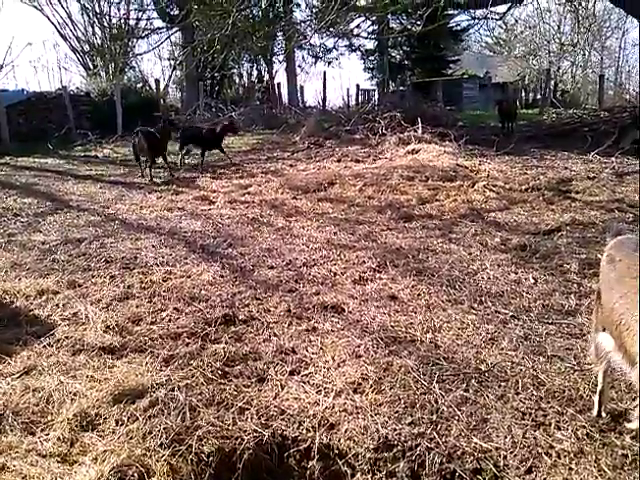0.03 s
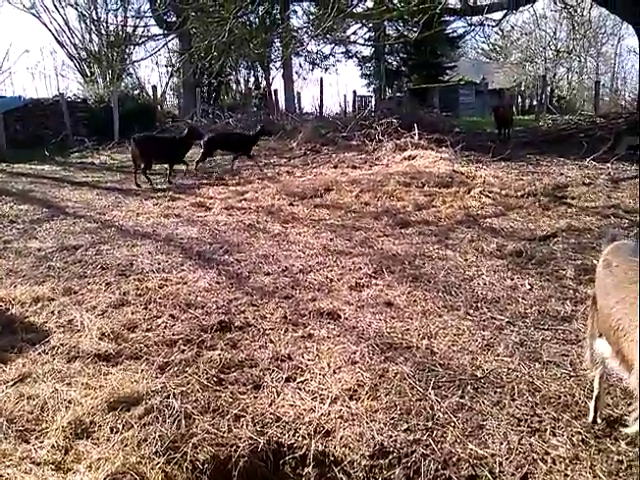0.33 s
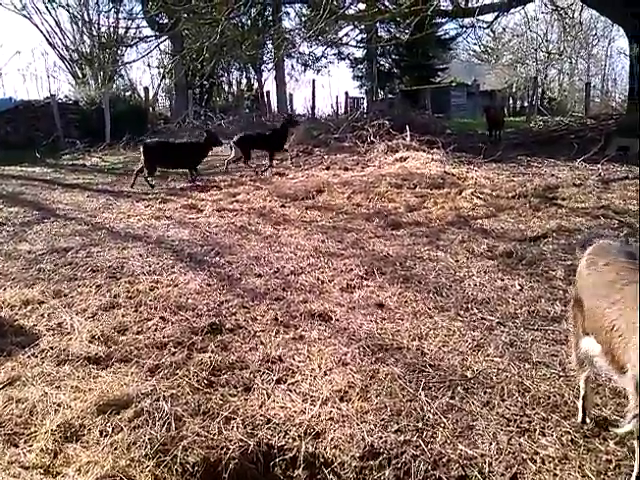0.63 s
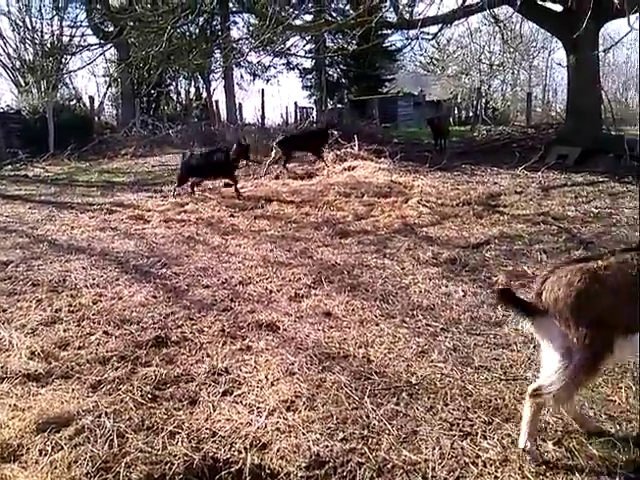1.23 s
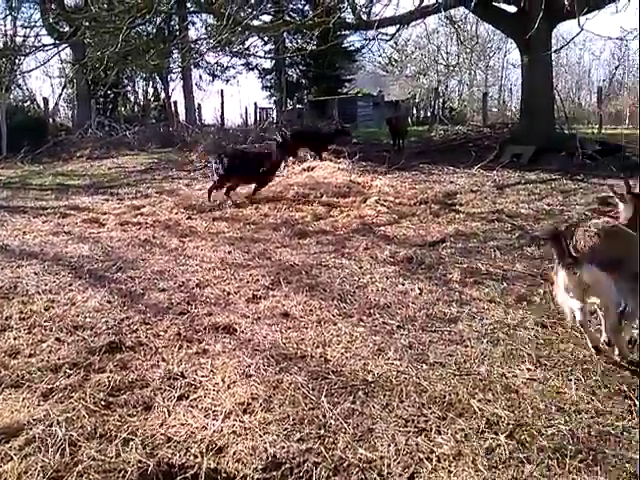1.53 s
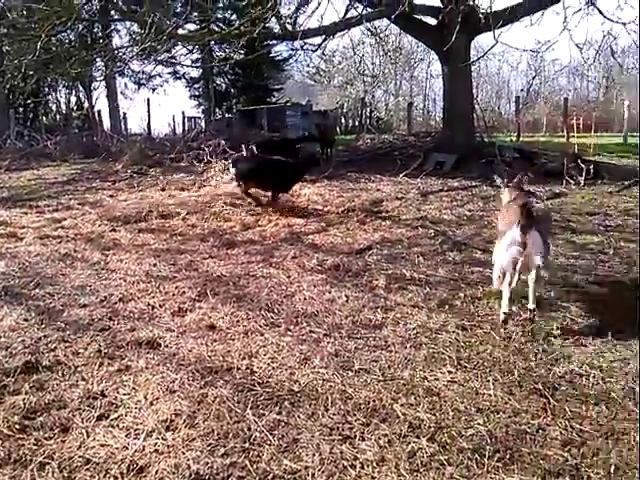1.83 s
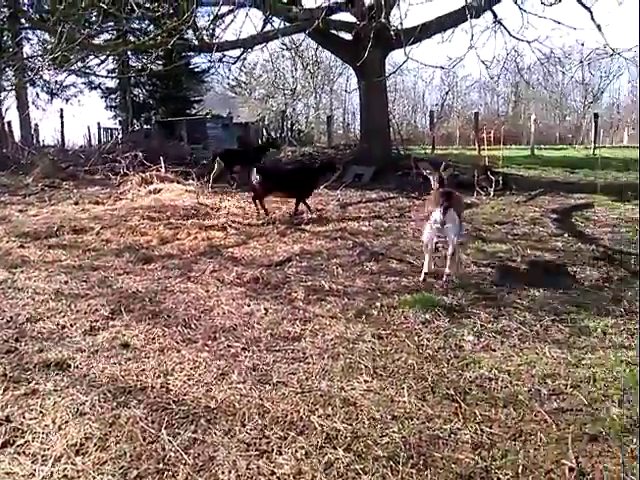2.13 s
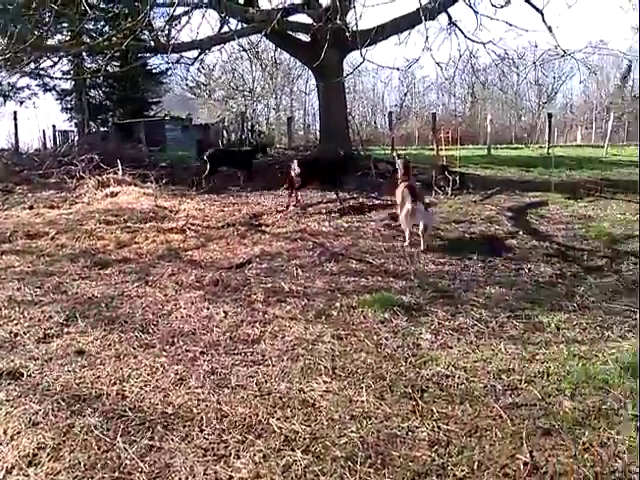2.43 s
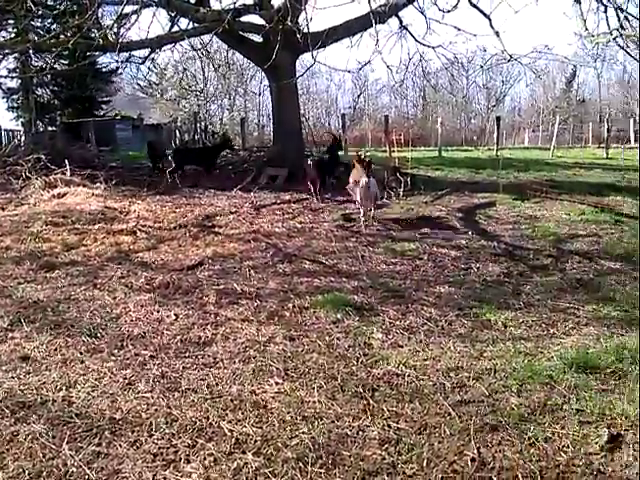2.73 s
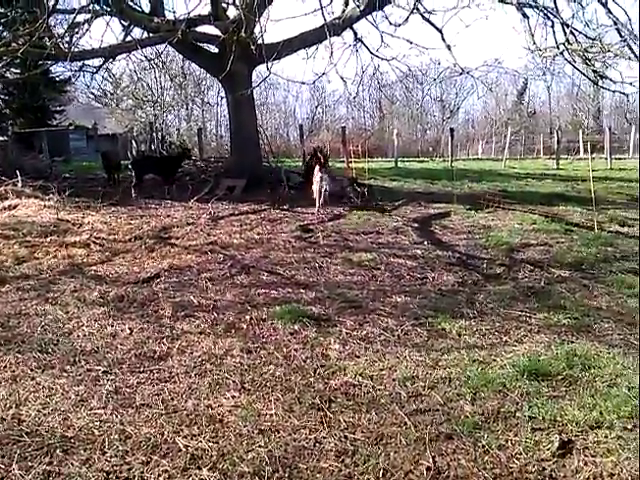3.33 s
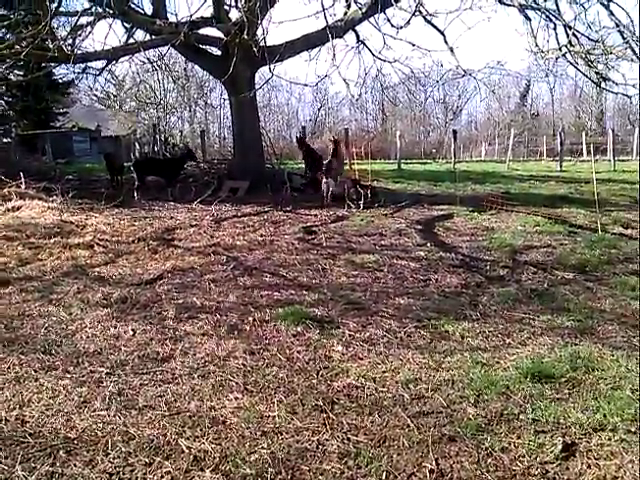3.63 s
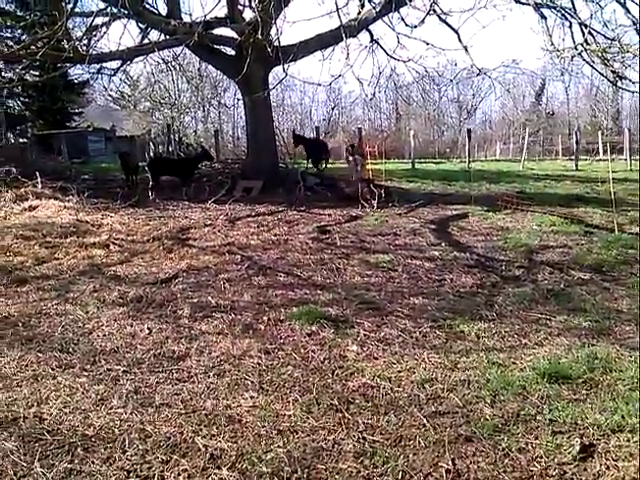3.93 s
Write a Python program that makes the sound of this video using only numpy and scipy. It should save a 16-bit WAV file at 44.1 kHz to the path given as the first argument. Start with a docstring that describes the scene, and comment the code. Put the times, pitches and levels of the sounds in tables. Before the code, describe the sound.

Dry straw rustles and snaps under trotting goats in a quiet paddock. A songbird twitters and trills first, a puff of wind bumps the microphone, then the steps crunch louder with soft hoof thuds.

```python
"""An open paddock, where goats trot away over dry straw: stalks rustle, crunch and snap in
tiny fractures, and hooves thud on the packed earth. A songbird twitters in whistles and rasps,
runs into a fading trill and goes on from farther off, its song scattered by the trees.
A puff of wind bumps the microphone over a quiet outdoor background."""
import sys
import numpy as np
from scipy import signal
from scipy.fft import rfft, irfft
from scipy.io import wavfile

SR = 44100
rng = np.random.default_rng(int(sys.argv[2]) if len(sys.argv) > 2 else 0)


def generate_wav(sig):
    """Save sig (samples, or channels by samples) to the path in sys.argv[1] as 16-bit PCM at SR."""
    pcm = np.round(np.clip(np.atleast_2d(sig).T, -1, 1) * 32767).astype(np.int16)
    wavfile.write(sys.argv[1], SR, pcm)


N = 176400
TIME = np.arange(N) / SR


def from_db(db):
    """Decibels to gain."""
    return 10 ** (np.asarray(db) / 20)


def rms_one(x):
    """Scale to rms 1."""
    return x / np.sqrt(np.mean(x ** 2) + 1e-20)


def response(colour, size=8192):
    """Minimum-phase impulse response of an EQ curve, at unit energy."""
    hz, db = np.transpose(colour)
    grid = np.maximum(np.arange(size // 2 + 1) * SR / size, 1)
    gain = from_db(np.interp(np.log(grid), np.log(hz), db))
    cepstrum = irfft(np.log(gain))
    cepstrum[1:size // 2] *= 2
    cepstrum[size // 2 + 1:] = 0
    ring = irfft(np.exp(rfft(cepstrum)))
    return ring / np.sqrt(np.sum(ring ** 2))


def coloured(x, colour):
    """Play a signal through an EQ curve; only the curve's shape counts."""
    return signal.fftconvolve(x, response(colour))[:N]


def shifted(colour, ratio):
    """The same EQ curve, pitched up or down."""
    return [(hz * ratio, db) for hz, db in colour]


def swells(rows):
    """Envelopes summed in power, each 20 dB down one rise before its peak and one fade after."""
    power = np.zeros(N)
    for time, rise, fade, db in rows:
        away = np.maximum((time - TIME) / rise, (TIME - time) / fade)
        near = away < 4
        power[near] += from_db(db - 20 * away[near]) ** 2
    return np.sqrt(power)


def wander(hz):
    """Smooth random modulation up to this rate; rms 1."""
    lowpass = signal.butter(2, hz, fs=SR, output="sos")
    return rms_one(signal.sosfilt(lowpass, rng.standard_normal(N)))


def unsteady(curve, flicker_db=2.5, flicker_hz=20):
    """Gain that rides a level curve and flickers around it."""
    flicker = flicker_db * np.clip(wander(flicker_hz), -2, 2)
    return from_db(np.interp(TIME, *np.transpose(curve)) + flicker)


def grains(per_s=5000, spread_db=2.5):
    """Random clicks of uneven size, like tiny fractures; rms 1."""
    sizes = from_db(spread_db * np.minimum(rng.exponential(1, N), 5))
    return rms_one(sizes * rng.choice([-1, 1], N) * (rng.random(N) < per_s / SR))


def scatter(x, t60_s):
    """Many faint echoes from stalks, trunks and branches."""
    echoes = (grains(per_s=1200, spread_db=1.5) * from_db(-60 * TIME / t60_s))[:SR]
    return signal.fftconvolve(x, echoes / np.sqrt(np.sum(echoes ** 2)))[:N]


def whistles(notes, waver, skew=1, taper=0.45):
    """Wavering sines that each arc through three pitches; skew delays the turn, taper softens the ends."""
    out = np.zeros(N)
    wobble = 1 + waver * wander(hz=256)
    for time, length, first, middle, last, db in notes:
        progress = np.linspace(0, 1, int(length * SR)) ** skew
        span = int(time * SR) + np.arange(len(progress))
        arc = np.polyfit([0, .5, 1], [first, middle, last], 2)
        hz = np.polyval(arc, progress) * wobble[span]
        envelope = from_db(db) * np.abs(np.sin(np.pi * progress)) ** taper
        out[span] += envelope * np.sqrt(2) * np.sin(2 * np.pi * np.cumsum(hz) / SR)
    return out


# Low rumble under a thin hiss: (frequency [Hz], level [dB])
AIR_COLOUR = [(20, -14), (45, 8.5), (70, -5), (200, -18.5), (700, -16), (2400, -22), (3700, -18.5),
              (8500, -32.5), (17000, -37.5)]

def background():
    """A quiet, steady bed of outdoor noise."""
    return from_db(-57.5) * coloured(rng.standard_normal(N), AIR_COLOUR)


# Fader ride of the straw under all the feet: (time [s], level [dB])
RUSTLE_LEVEL = [(.42, -52.5), (.56, -49), (.72, -51.5), (1.15, -53.5), (1.25, -48), (1.38, -45),
                (1.57, -55), (1.63, -51), (2.46, -50), (2.65, -55), (2.95, -52.5), (3.6, -52.5),
                (3.95, -58.5)]
# Legs brushing through: (time [s], rise [s], fade [s], level [dB])
SWISHES = [(1.505, 0.025, 0.062, -41), (1.788, 0.029, 0.04, -41.5), (2.555, 0.073, 0.055, -42.5)]
# Dry, papery top end: (frequency [Hz], level [dB])
RUSTLE_COLOUR = [(700, -18), (2400, -9.5), (3600, -14), (4600, -4), (5800, 3.5), (7200, -8), (8500, -16.5),
                 (16000, -24.5)]

def rustle():
    """Loose straw gives in countless tiny fractures, a touch brighter where legs sweep through it."""
    bed = coloured(unsteady(RUSTLE_LEVEL) * grains(), RUSTLE_COLOUR)
    swishes = coloured(swells(SWISHES) * grains(), shifted(RUSTLE_COLOUR, 1.06))
    return bed + swishes


# Fader ride of the running herd: (time [s], level [dB])
PATTER_LEVEL = [(1.0, -62.5), (1.7, -58), (4, -57)]
# Muffled low end: (frequency [Hz], level [dB])
PATTER_COLOUR = [(35, -3.5), (75, 3), (240, -5), (1200, -29)]

def herd_patter():
    """Far hoofbeats blur into a dull, flickering rumble."""
    return coloured(unsteady(PATTER_LEVEL) * rng.standard_normal(N), PATTER_COLOUR)


# Close whistles: (time [s], length [s], start [Hz], middle [Hz], end [Hz], level [dB])
OPENING_NOTES = [(0.00189, 0.0177, 3100, 2100, 2600, -48.5), (0.02, 0.038, 3400, 4250, 4450, -40.5),
                 (.065, .014, 4100, 3800, 2350, -48.5), (.06, 0.035, 5700, 6000, 5700, -49),
                 (.122, .032, 4400, 4440, 4560, -38.5), (.146, 0.035, 5830, 5950, 6200, -37.5),
                 (.163, .012, 5000, 4700, 2660, -39), (.173, 0.0373, 2950, 2620, 3000, -46.5),
                 (.186, .022, 4250, 3520, 3400, -45.5), (0.28, 0.0407, 2950, 2270, 3600, -42),
                 (0.277, 0.045, 3100, 3520, 3520, -51.5), (.32, 0.0367, 2800, 2350, 2700, -39.5),
                 (.316, 0.0606, 3280, 3365, 3120, -41), (.357, 0.0187, 2850, 2320, 2670, -41)]
# Raspy accents: (time [s], rise [s], fade [s], level [dB])
RASPS = [(.008, 0.05, 0.054, -36.5), (.068, 0.035, 0.058, -34), (.172, 0.01, 0.14, -41)]
# Their narrow, bright band: (frequency [Hz], level [dB])
RASP_COLOUR = [(2000, -23), (3600, -20), (4200, -5.5), (5200, -1), (6100, 2), (6700, -30), (9000, -36)]

def opening_twitter():
    """The songbird whistles in two voices, roughened by bursts of noise."""
    rasp = coloured(swells(RASPS) * rng.standard_normal(N), RASP_COLOUR)
    return whistles(OPENING_NOTES, waver=.012) + rasp


# Single stalks breaking: (time [s], level [dB], ring [Hz])
SNAPS = [(.110, -30.5, 5600), (.345, -44, 13700), (1.401, -46, 5200), (1.761, -47, 6100),
         (1.849, -45, 5900), (2.343, -24, 6000), (2.359, -29, 6000), (2.3625, -30.5, 6150),
         (2.506, -38.5, 5800), (2.539, -32, 5800), (2.9215, -22, 6150), (2.9345, -19, 6100),
         (2.9372, -17, 6100), (2.9435, -26, 5800), (2.9855, -31.5, 5700), (3.002, -29, 5600),
         (3.068, -36, 2300), (3.160, -35.5, 2400), (3.167, -36, 5850), (3.202, -25.5, 5440),
         (3.378, -34, 5900), (3.4915, -28, 5700), (3.495, -31.5, 5520), (3.706, -38.5, 6100),
         (3.825, -39, 5460), (3.8865, -33, 5860)]
# Brittle ring of a stalk pitched at STALK_HZ: (frequency [Hz], level [dB])
SNAP_COLOUR = [(900, -20), (2300, -12), (3700, -16), (4900, -0.5), (5900, 13), (8200, -17), (10200, -14),
               (16000, -31)]
STALK_HZ = 5900

def snaps(tear_s=.0025, size=2048):
    """Each stalk parts in a quick run of tearing fibres and rings at its own pitch."""
    out = np.zeros(N + size)
    for time, db, hz in SNAPS:
        fibres = rng.standard_normal(size) * from_db(-20 * TIME[:size] / tear_s)
        ring = response(shifted(SNAP_COLOUR, hz / STALK_HZ))
        snap = signal.fftconvolve(fibres, ring)[:size]
        snap *= np.sqrt(tear_s * SR / 2 / np.sum(snap ** 2))  # equal energy ahead of the fader
        out[int(time * SR):][:size] += from_db(db) * snap
    return out[:N] + from_db(-9) * scatter(out[:N], t60_s=.03)


# Fade-out of the trill: (time [s], level [dB])
TRILL_LEVEL = [(.58, -42.5), (.72, -49.5), (1.16, -50), (1.28, -59)]

def trill(start_s=.430, period_s=.04725, slowing_s=.00075, chip_s=.021):
    """The bird repeats one arched chip, slowing and sinking as it goes."""
    arc_hz, sag_per_chip = np.array([2200, 2720, 1900]), .006
    chips = []
    for k in range(17):
        time = start_s + period_s * k + slowing_s * k ** 2 / 2
        db = np.interp(time, *np.transpose(TRILL_LEVEL))
        chips.append((time, chip_s, *(arc_hz * (1 - sag_per_chip * k)), db))
    return whistles(chips, waver=.055, skew=1.4, taper=0.81)


# Soft gusts: (time [s], rise [s], fade [s], level [dB])
GUSTS = [(.51, 0.049, 0.088, -45), (1.045, 0.02, 0.051, -35)]
# Hard bumps of the puff: (time [s], peak [dB])
BUMPS = [(1.024, -39), (1.034, -26), (1.061, -27), (1.070, -30)]
# Sub-heavy boom of both: (frequency [Hz], level [dB])
WIND_COLOUR = [(15, -6), (35, 0), (70, 1), (180, -15.5), (320, -26.5), (900, -70)]

def wind_puff():
    """Wind on the microphone: swells of rumble and pressure kicks that push and pull in turn."""
    kicks = np.zeros(N)
    for k, (time, db) in enumerate(BUMPS):
        kicks[int(time * SR)] += from_db(db) * (-1) ** k
    boom = response(WIND_COLOUR)
    bumps = signal.fftconvolve(kicks, boom / np.abs(boom).max())[:N]
    return bumps + coloured(swells(GUSTS) * rng.standard_normal(N), WIND_COLOUR)


# Runs of faint chirps: (start [s], end [s])
CHIRP_RUNS = [(1.041, 1.09), (2.021, 2.1), (2.801, 2.87)]
# One hoarse call: (time [s], length [s], start [Hz], middle [Hz], end [Hz], level [dB])
HOARSE_CALL = [(2.44, 0.0384, 1616, 1614, 1530, -48.5)]
# Distant whistles: (time [s], length [s], start [Hz], middle [Hz], end [Hz], level [dB])
FAR_NOTES = [(2.68, 0.12, 3838, 4160, 4100, -50), (2.775, 0.062, 5600, 6050, 6170, -54.5),
             (2.825, .055, 4340, 4580, 4300, -51)]

def far_song(chirp_s=0.039, chirp_hz=3360, chirp_db=-57, fall=0.132):
    """Falling chirps at random pitches, a call made hoarse by deep pitch flutter, and a few whistles."""
    starts = np.concatenate([np.arange(start, end, chirp_s) for start, end in CHIRP_RUNS])
    pitches = chirp_hz * np.exp(0.098 * rng.standard_normal(len(starts)))
    chirps = [(time, chirp_s, hz * (1 + fall), hz, hz * (1 - fall / 2), chirp_db)
              for time, hz in zip(starts, pitches)]
    return whistles(HOARSE_CALL, waver=.13) + whistles(FAR_NOTES + chirps, waver=.032)


# Footfalls in the straw: (time [s], rise [s], fade [s], crackle [dB], crunch [dB])
STEPS = [(1.5058, 0.00031, 0.004, -31, -37), (1.683, 0.0044, 0.064, -44.5, -62),
         (2.342, .0026, 0.054, -35.5, -45.5), (2.923, 0.0052, 0.066, -37, -35),
         (2.935, 0.0095, 0.053, -26, -38.5), (3.008, 0.18, 0.17, -38.5, -47),
         (3.067, 0.0011, .014, -41, -46.5), (3.117, 0.014, 0.075, -38, -42),
         (3.162, 0.0089, 0.091, -35.5, -45.5), (3.206, .005, 0.061, -38.5, -43),
         (3.31, 0.057, 0.12, -44.5, -51), (3.376, 0.016, 0.043, -37, -43),
         (3.494, 0.0023, 0.05, -32.5, -45), (3.654, 0.002, 0.096, -50.5, -48.5),
         (3.756, 0.0026, 0.077, -48, -47.5), (3.796, 0.0082, .055, -40.5, -51),
         (3.83, 0.012, .07, -46.5, -50.5), (3.889, 0.0017, 0.057, -43.5, -49.5)]
# Crisp top of a step: (frequency [Hz], level [dB])
CRACKLE_COLOUR = [(1000, -26.5), (2500, -10.5), (3700, -15), (4700, 1), (5500, 6), (7100, -6.5),
                  (8500, -19.5), (16000, -49)]
# Midrange body of a step: (frequency [Hz], level [dB])
CRUNCH_COLOUR = [(150, -4), (450, -0.5), (660, 9.5), (1100, 2), (2400, 9), (3700, 0.5), (6000, -42)]

def straw_steps():
    """Each hoof crushes the straw in a burst of fractures, bright crackle over lower crunch."""
    crackle = swells([(time, rise, fade, db) for time, rise, fade, db, _ in STEPS]) * grains()
    crunch = swells([(time, rise, fade, db) for time, rise, fade, _, db in STEPS]) * grains()
    return coloured(crackle, CRACKLE_COLOUR) + coloured(crunch, CRUNCH_COLOUR)


# Hooves landing: (time [s], level [dB])
THUDS = [(1.597, -55), (1.685, -47.5), (1.79, -47.5), (2.692, -45.5), (2.925, -37), (2.954, -42.5),
         (3.10, -47.5), (3.244, -48), (3.461, -46.5), (3.755, -40), (3.84, -47)]
# Low weight of the ground: (frequency [Hz], level [dB])
THUD_COLOUR = [(40, -0.5), (80, 0.5), (130, -12), (195, 3.5), (300, -2.5), (720, -14), (1300, -11.5),
               (3000, -38)]

def hoof_thuds(rise_s=0.014, fade_s=0.048):
    """Packed earth answers each hoof with a dull thud that dies quickly."""
    envelope = swells([(time, rise_s, fade_s, db) for time, db in THUDS])
    return coloured(envelope * rng.standard_normal(N), THUD_COLOUR)


def birdsong():
    """Trees scatter the song: the near phrases stay mostly dry, the far ones mostly echo."""
    near, far = opening_twitter() + trill(), far_song()
    echoes = scatter(from_db(-4) * near + far, t60_s=0.22)
    return near + from_db(-7) * far + echoes


def scene():
    """All layers at one microphone."""
    beds = background() + rustle() + herd_patter()
    return (beds + birdsong() + snaps() + wind_puff() + straw_steps() + hoof_thuds())[None]


def record(dry, cutoff_hz=17100):
    """A steep high cut on the whole mix."""
    return signal.sosfilt(signal.ellip(10, .1, 70, cutoff_hz, fs=SR, output="sos"), dry)


dry = scene()
out = record(dry)
generate_wav(out)
```